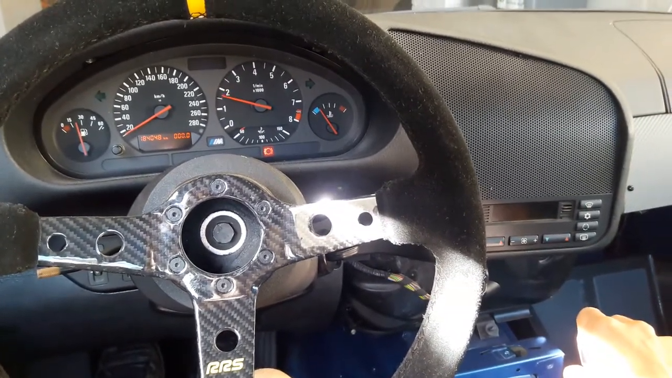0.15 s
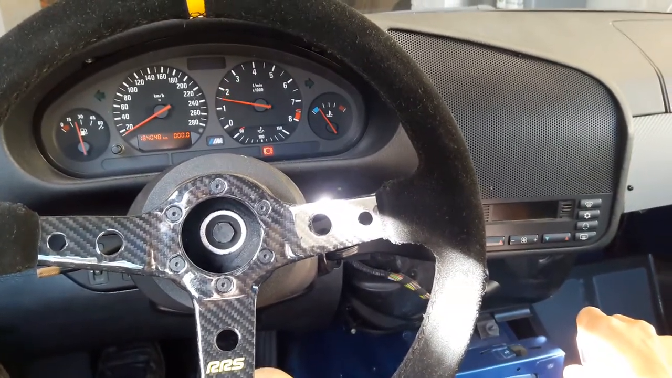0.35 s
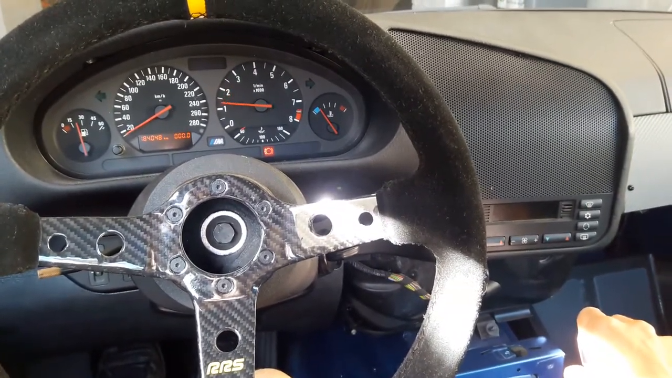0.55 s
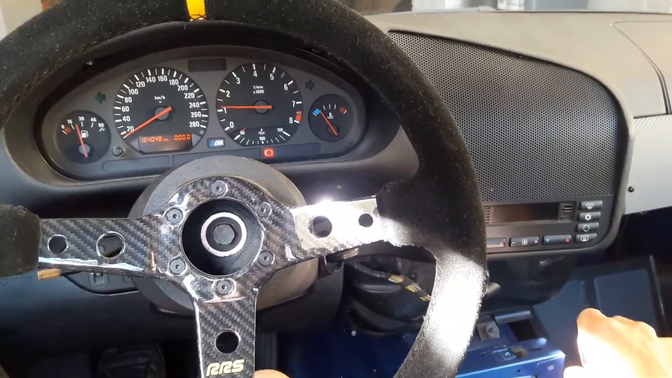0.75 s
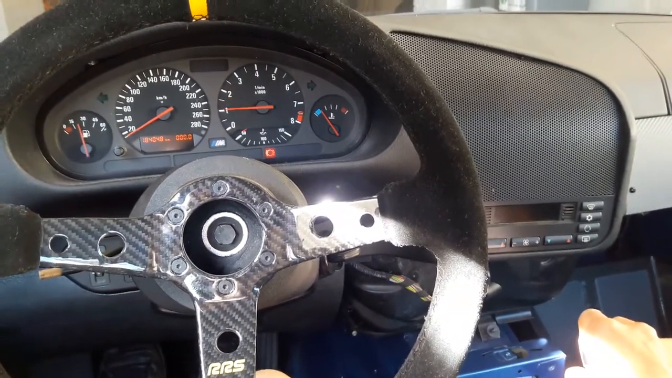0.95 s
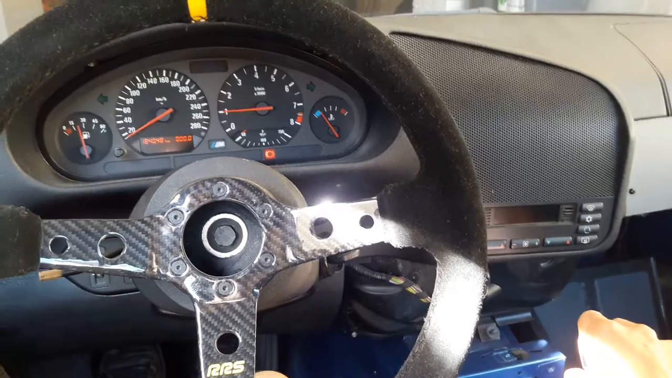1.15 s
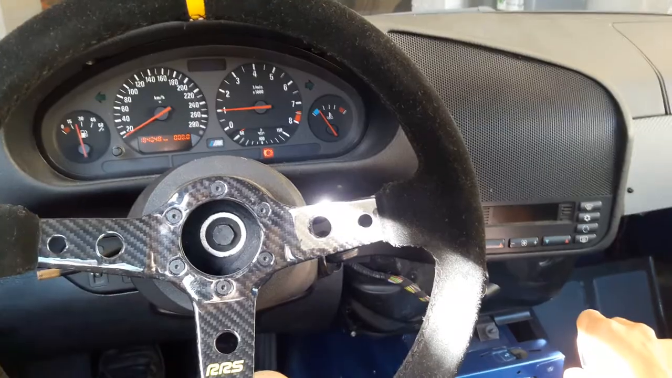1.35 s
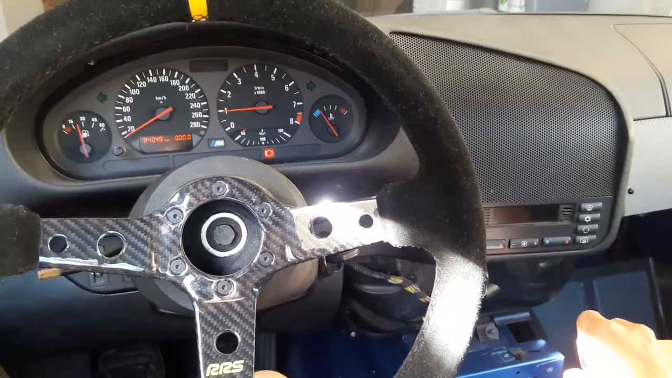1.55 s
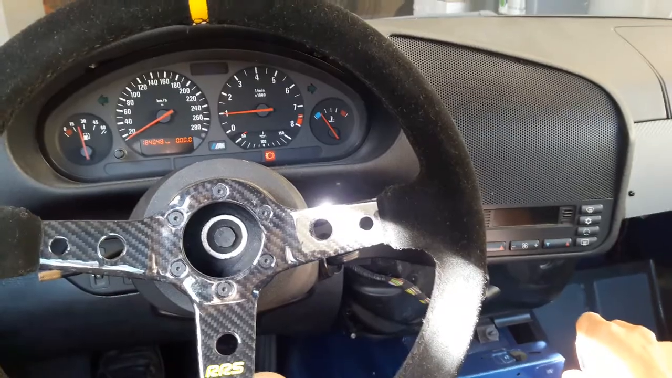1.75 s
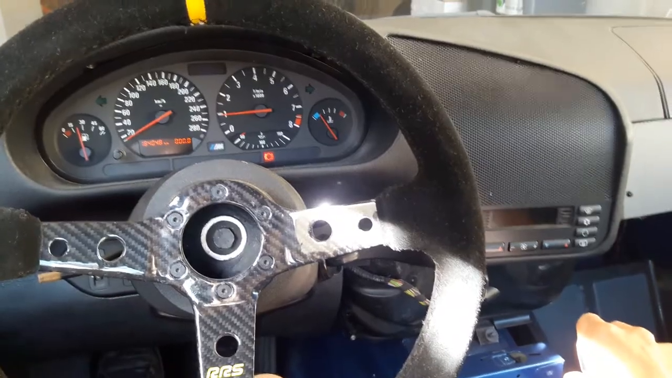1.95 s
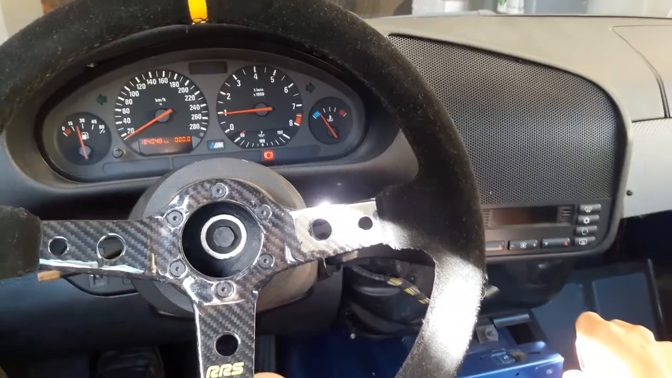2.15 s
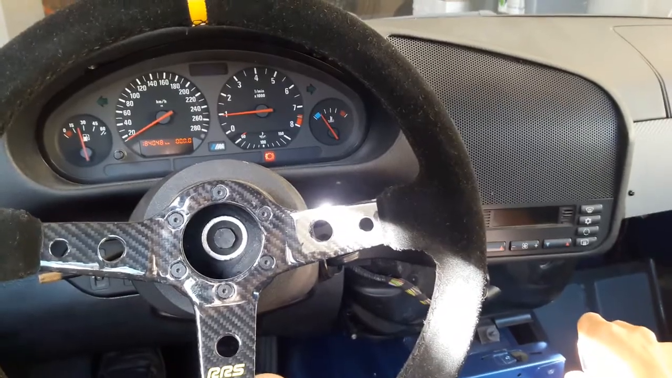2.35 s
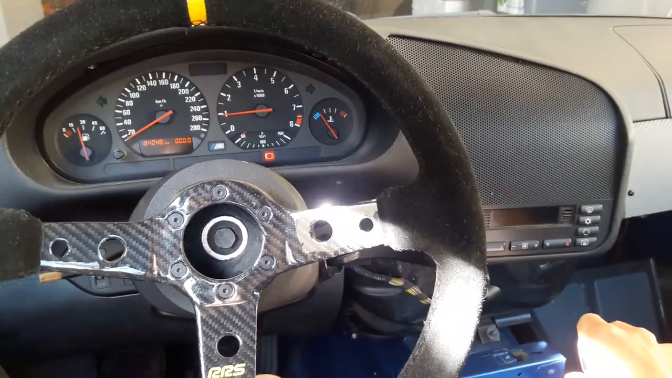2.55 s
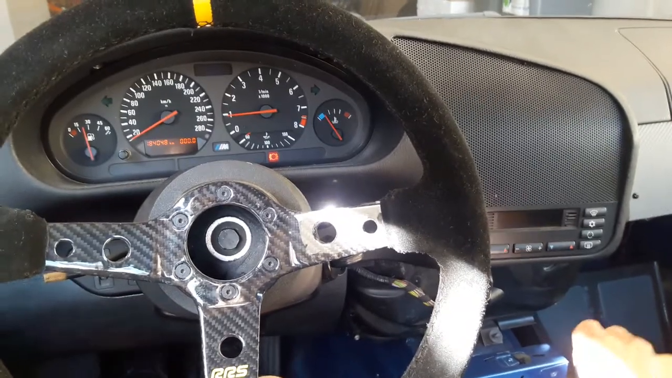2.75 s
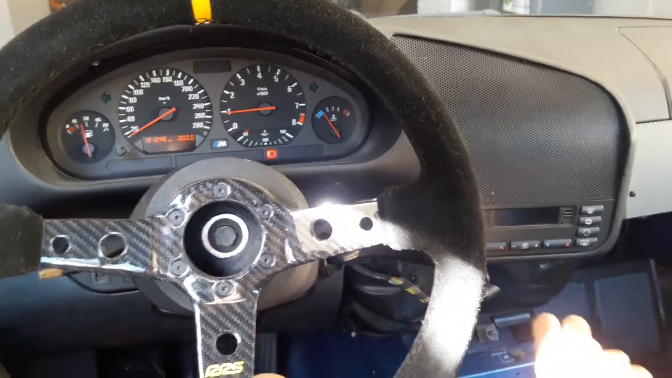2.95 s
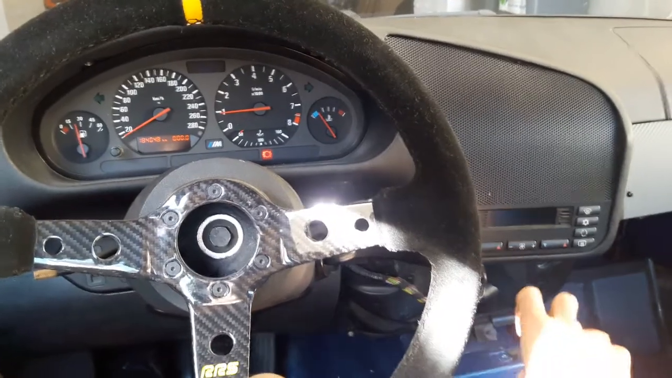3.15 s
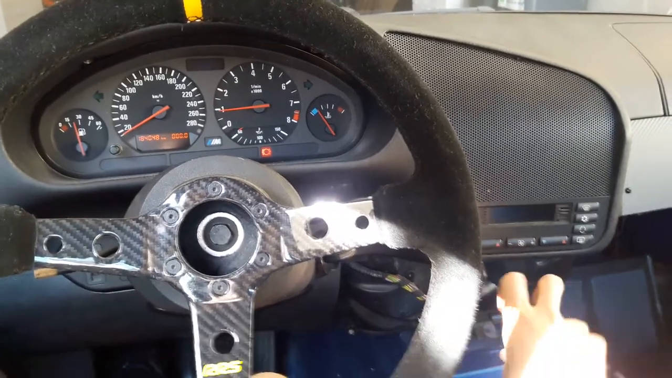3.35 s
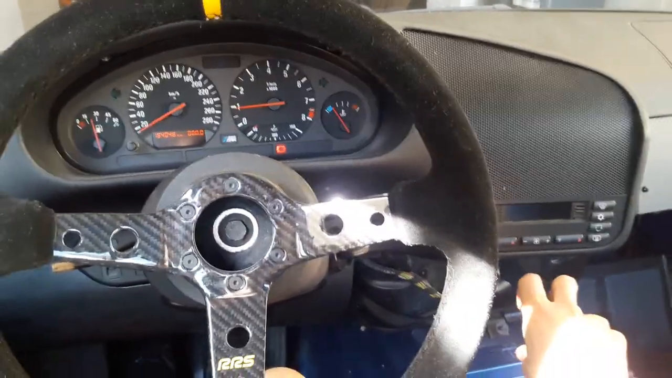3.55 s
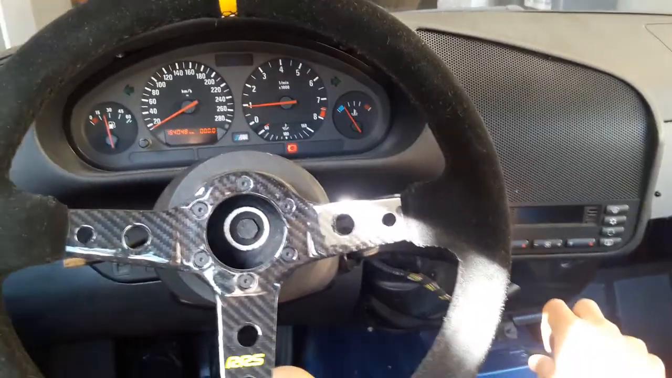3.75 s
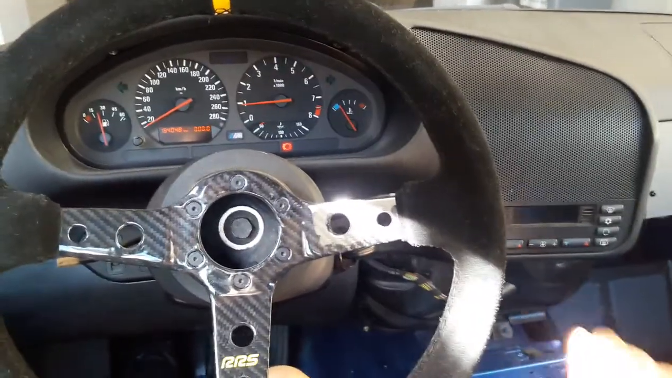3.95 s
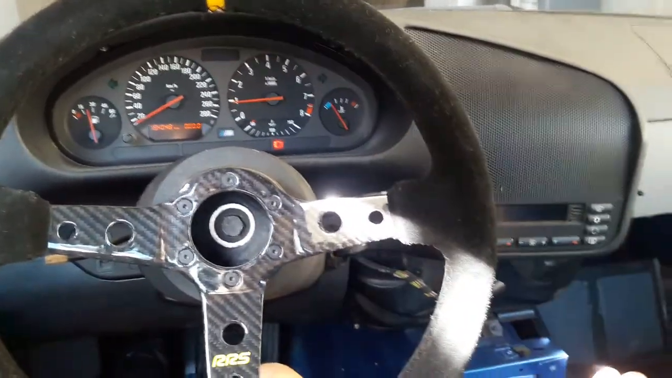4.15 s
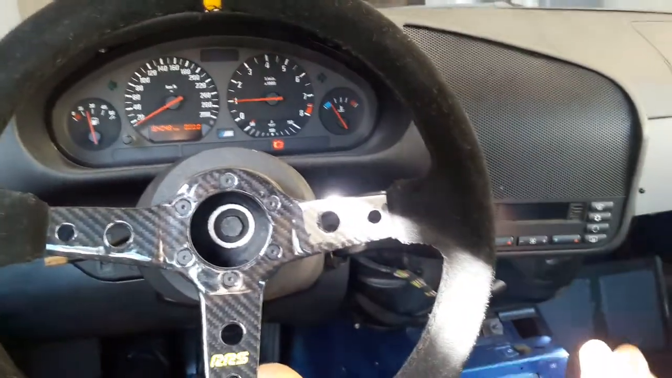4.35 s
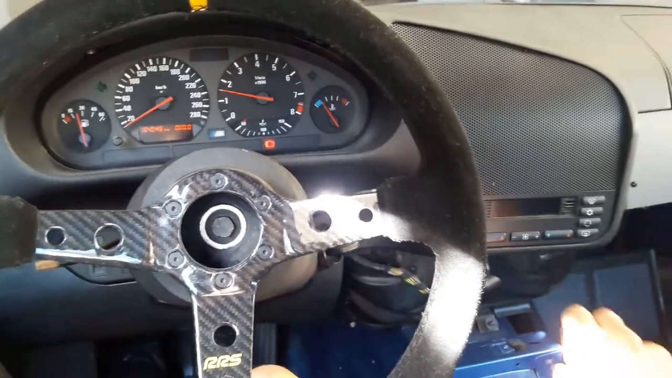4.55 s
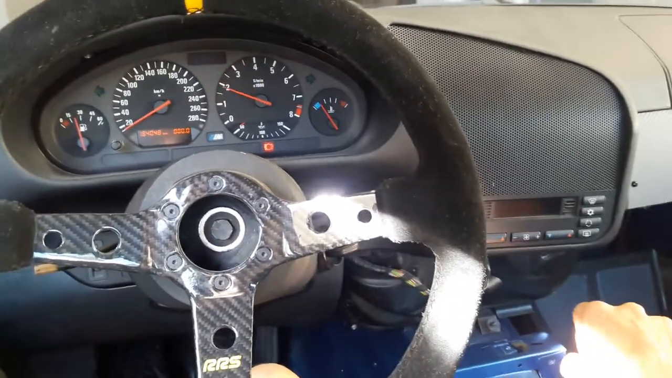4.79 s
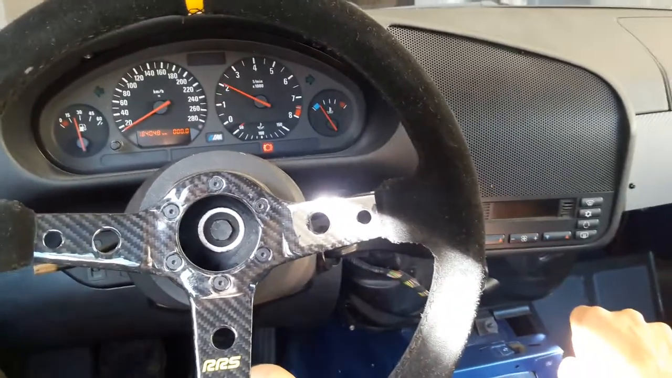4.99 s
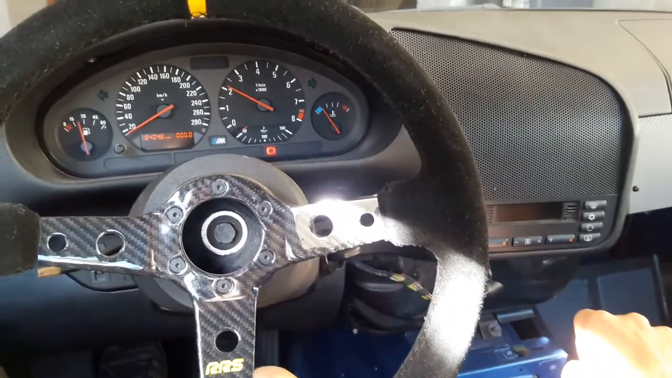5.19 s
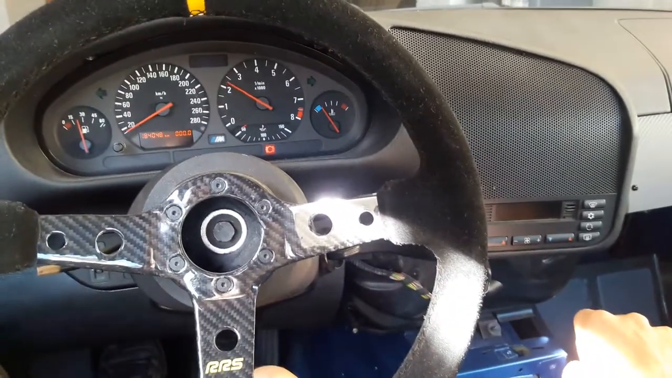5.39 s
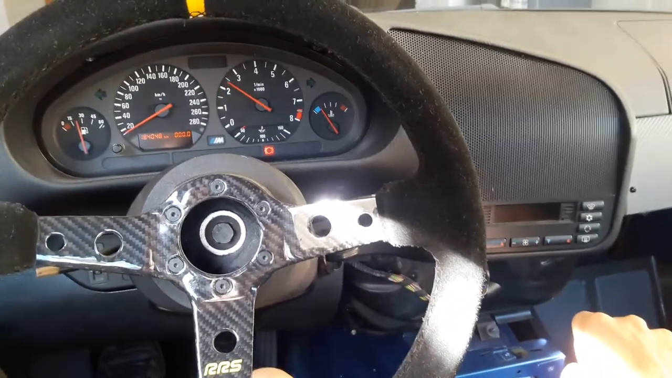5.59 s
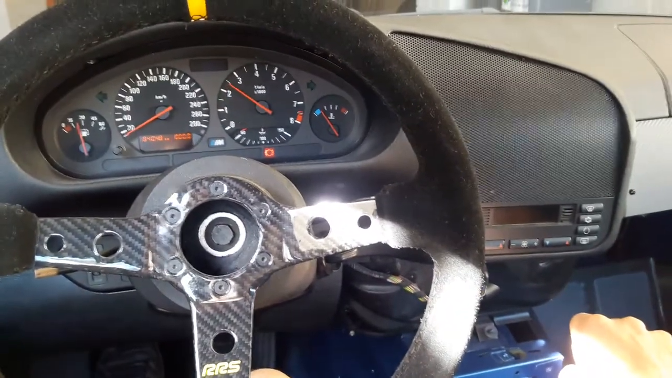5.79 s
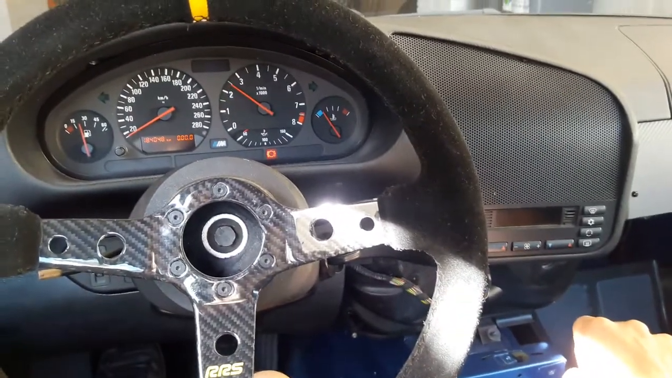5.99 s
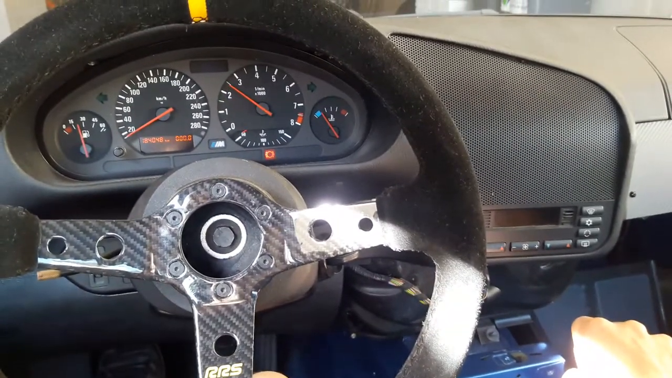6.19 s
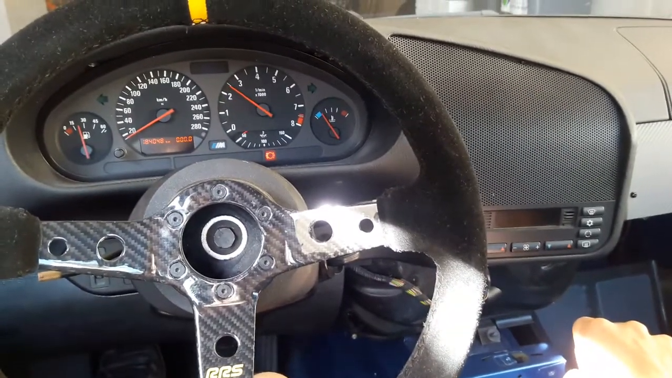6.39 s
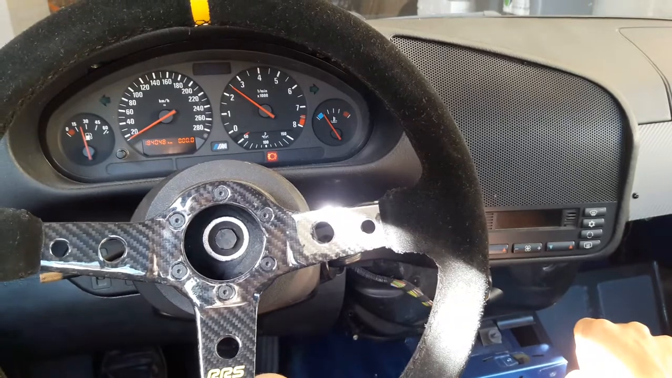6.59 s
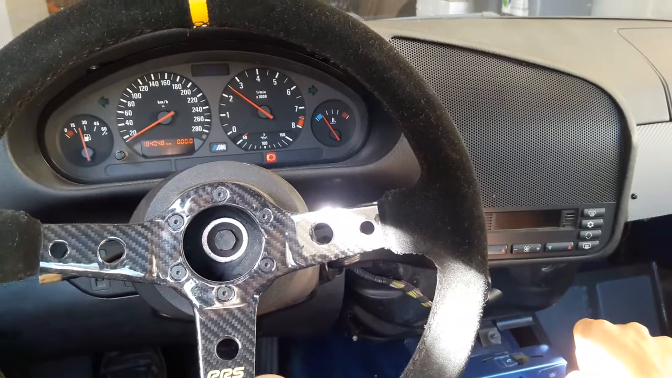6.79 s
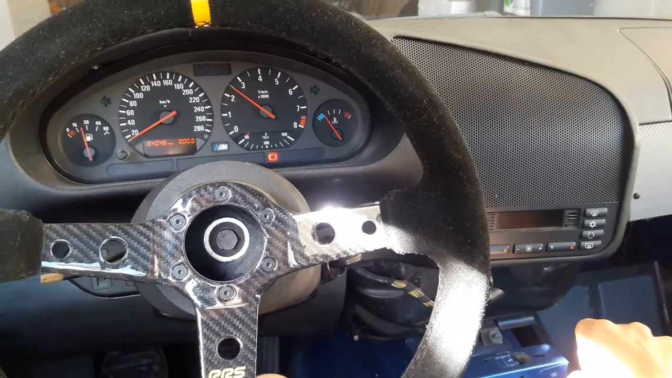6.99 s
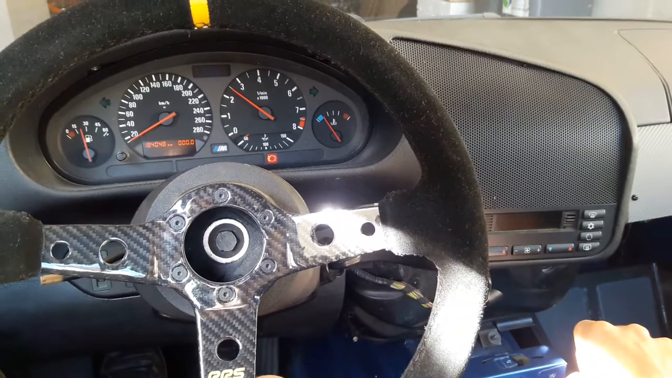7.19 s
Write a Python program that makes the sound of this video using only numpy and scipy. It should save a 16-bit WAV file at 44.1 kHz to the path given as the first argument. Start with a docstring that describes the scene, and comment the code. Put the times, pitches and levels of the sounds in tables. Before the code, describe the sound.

Close stereo inside a parked car's cabin: a six-cylinder engine falls from raised revs to a low, lumpy, booming idle. Near three seconds the gear lever clicks, creaks and clunks dully. Just after four seconds another clunk, then a puff of intake hiss as revs climb, with chain and gear whine, and hold in a steady throaty drone.

```python
"""A six-cylinder engine, heard by two microphones in the car's cabin, sinks to a lumpy idle; later it is revved and held.
The exhaust is a sum of crank orders with scatter, booming through pipe and cabin. Chain and gearbox whine,
with thin high whines above, as tones locked to the crank; valve gear rustles and air hisses past the throttle
as shaped noise. Close by, the gear lever clunks as short noise bursts ringing its linkage, and creaks as short
narrow tones of smeared pitch."""
import sys
import numpy as np
from scipy import signal
from scipy.fft import rfft, irfft, next_fast_len
from scipy.io import wavfile
from scipy.ndimage import uniform_filter1d

SR = 44100
rng = np.random.default_rng(int(sys.argv[2]) if len(sys.argv) > 2 else 0)


def invert_db(level):
    """Linear amplitude ratio for a level in decibels (20 dB per decade), elementwise."""
    return 10 ** (np.asarray(level, dtype=float) / 20)


def file_out(sig):
    """Save sig as 16-bit WAV at sys.argv[1]."""
    # one column per channel
    cols = np.atleast_2d(sig).T
    # limit, then scale
    lim = np.clip(cols, -1, 1)
    pcm = np.round(lim * 32767).astype(np.int16)
    wavfile.write(sys.argv[1], SR, pcm)


N = 318843


def unit(x):
    """Scale to rms 1."""
    return x / np.sqrt(np.mean(x ** 2) + 1e-20)


def along(points, hz):
    """Read f/Hz, value points on a log frequency axis."""
    f, v = np.transpose(points)
    return np.interp(np.log(hz + 1), np.log(f + 1), v)


def curves(rows):
    """One value per sample for each column after the time."""
    s, *cols = np.transpose(rows)
    return [np.interp(np.arange(N) / SR, s, c) for c in cols]


def wobble(rate):
    """A random curve of straight pieces, rate knots a second."""
    knots = rng.standard_normal(int(N / SR * 60) + 2)  # enough for rates up to 60
    return np.interp(np.arange(N) * rate / SR, np.arange(len(knots)), knots)


def filtered(x, response):
    """Filter x by a complex response of frequency, with padding so that tails do not wrap round."""
    m = 2 * next_fast_len(N // 2 + SR // 4)
    return irfft(rfft(x, m) * response(np.fft.rfftfreq(m, 1 / SR)), m)[..., :N]


def causal(gain):
    """The minimum-phase response with this gain, which rings only after its cause."""
    cepstrum = irfft(np.log(gain))
    half = len(cepstrum) // 2
    cepstrum[1:half] *= 2
    cepstrum[half + 1:] = 0
    return np.exp(rfft(cepstrum))


def bumps(rows, hz):
    """Gain of resonances that stand above a flat response."""
    return invert_db(sum(db / (1 + (2 * (hz - c) / w) ** 2) for c, w, db in rows))


def rush(spectrum):
    """Stereo noise of rms 1 with this spectrum, alike at both microphones in the bass, unlike in the treble."""
    # likeness of the two microphones: f/Hz, correlation
    alike = [(100, 0.99), (350, 0.67), (500, 0.2), (700, 0.21), (1000, 0.22), (1400, 0.38), (2000, 0.087),
             (3500, 0.039)]

    def mid_side_gain(hz):
        turn = np.arccos(np.clip(along(alike, hz), -1, 1)) / 2
        return invert_db(along(spectrum, hz)) * [np.cos(turn), np.sin(turn)]

    mid, side = filtered(rng.standard_normal((2, N)), mid_side_gain)
    return unit(np.array([mid + side, mid - side]))


def tone(order, crank, waver_db):
    """One crank order, rms 1 before it wavers; the pattern of firings sets its phase."""
    # strength of each firing, in firing order
    cylinders = [1.3, .8, 1.1, .7, 1.2, .9]
    phase = np.angle(np.fft.fft(cylinders))[round(2 * order) % 6]
    phase = phase + .13 * order ** 2  # longer pipe runs spread the high orders
    return np.sqrt(2) * invert_db(waver_db * wobble(9)) * np.cos(order * (crank - 3.1) + phase)


def intake():
    """Air hisses past the throttle as it opens: band-shaped noise whose level follows the air."""
    # air past the throttle: t/s, level/dB before a small random waver
    air = [(0, -62.5), (4.19, -83), (4.23, -49.5), (4.3, -54), (4.6, -58.5), (5, -56), (5.5, -57),
           (7.23, -61.5)]
    # colour of the air noise: f/Hz, relative density/dB
    air_colour = [(3000, -63.5), (4500, -8), (5800, 1), (6800, -6), (7400, -17.5), (9000, -51.5)]
    return invert_db(curves(air)[0] + 1.7 * wobble(25)) * rush(air_colour)


def valve_gear(crank, rustle_db):
    """A rustle that pulses with the firings and rings the panels, and a high hiss that puffs once an engine cycle."""
    # colour of the rustle ahead of the panels: f/Hz, relative density/dB
    rustle_colour = [(180, -32.5), (300, 1.5), (422, -10.5), (515, -8.5), (629, -16), (746, -15),
                     (812, -12), (1020, -16), (1180, -15), (1380, -14.5), (2400, -21), (2570, -22.5),
                     (5020, -34.5), (9000, -55), (11700, -85.5), (19800, -120)]
    # colour of the high hiss: f/Hz, relative density/dB
    hiss_colour = [(4710, -32), (8000, -11), (9130, -5.5), (9950, 2.5), (11400, 6), (13400, 1.5),
                   (15500, 0)]
    # panel resonances: f/Hz, width/Hz, boost/dB
    panels = [(1213, 83, 3.5), (1590, 69, 3.5), (1890, 50, 5), (2330, 11, 8), (2772, 13, 12), (4070, 19, 0),
              (4560, 40, -2.5), (6360, 55, 8)]
    cycle = crank / 2 - 1.2  # one engine cycle takes two crank turns
    beat_db = 0.29 * np.cos(3 * crank) + 0.54 * np.cos(cycle) + 0.99 * wobble(19)
    rustle = invert_db(rustle_db + 8 + beat_db) * filtered(rush(rustle_colour), lambda hz: bumps(panels, hz))
    puff = np.exp(4 * (np.cos(cycle) - 1))
    steady_hiss = invert_db(-72 + .6 * wobble(11)) * rush(hiss_colour)
    puffing_hiss = invert_db(-64 + 1.5 * wobble(8)) * puff * rush(hiss_colour)
    speed_hiss = invert_db(rustle_db - 23 + .7 * wobble(12)) * rush(hiss_colour)
    return rustle + steady_hiss + puffing_hiss + speed_hiss


def whines(crank, revved, rustle_db, firing_hz):
    """Tooth meshes sing at whole numbers of teeth per turn, loudest where their cases resonate; thin whines join."""
    # chain mesh and its sidebands: crank order, relative level/dB (mesh above 0, sidebands below)
    chain_mesh = [(18.5, -14.5), (19, 3), (19.5, -10.5), (20, -4)]
    # gear mesh and its sidebands: crank order, relative level/dB (mesh above 0, sidebands below)
    gear_mesh = [(28.5, -13), (29, 4), (29.5, -7)]
    # level of the chain at its mesh pitch: f/Hz, level/dB
    chain_case = [(290, -32), (305, -41.5), (330, -38.5), (360, -42.5), (420, -50), (560, -46), (700, -43),
                  (760, -35.5), (815, -36)]
    # level of the gears at their mesh pitch: f/Hz, level/dB with the clutch up
    gear_case = [(450, -51.5), (475, -39.5), (500, -52.5), (620, -53.5), (740, -49), (805, -41),
                 (850, -56.5), (1000, -59.5), (1090, -32.5), (1180, -42), (1245, -38)]
    # thin high whines, chain and gear overtones among them: crank order
    thin_orders = [16.35, 24.9, 27.05, 37, 39, 43.75, 48.9, 50.5, 54.1, 57.1, 57.5, 58, 58.5, 64.55, 66.5,
                   76, 87, 95, 113.3]
    # a row for each thin whine, against the rustle ahead of the housing: idle/dB, revved/dB, left over right/dB
    thin_levels = [(-30, -18.5, -0.5), (-23.5, -14.5, -2.5), (-24, -10.5, -6), (-15.5, -12.5, 1),
                   (-18, -13.5, 9), (-18.5, -7, 5), (-29, -16, -1.5), (-26.5, -21, -4.5), (-27.5, -20.5, 0),
                   (-13, -13, -0.5), (-13.5, -26.5, 5), (-9.5, -24.5, 0.5), (-12.5, -28.5, 0),
                   (-22, -22, -3), (-19.5, -23.5, -5), (-33.5, -18, 0), (-29.5, -28, -7), (-35, -24, -7.5),
                   (-38, -25.5, -11.5)]
    # the thin whines swell as they cross these: f/Hz, width/Hz, boost/dB
    housing = [(1085, 55, 10), (2730, 37, 3)]
    sideband_revved_db = -4  # the meshes run smoother at speed
    clutch_down_s, clutch_up_s, clutch_travel_s, clutch_db = 2.82, 4.98, 0.13, -24  # down, it hushes the gears

    def mesh(rows):
        total = np.zeros(N)
        for order, db in rows:
            smoother_db = sideband_revved_db * revved * (db < 0)
            total += invert_db(db + smoother_db) * tone(order, crank, waver_db=2.1)
        return total

    thin = np.zeros((2, N))
    for order, (idle_db, rev_db, pan_db) in zip(thin_orders, thin_levels):
        level = invert_db(idle_db + revved * (rev_db - idle_db))
        thin += invert_db([[pan_db / 2], [-pan_db / 2]]) * level * tone(order, crank, waver_db=2.5)
    t = np.arange(N) / SR
    turns_hz = firing_hz / 3
    clutch = np.clip(np.minimum(t - clutch_down_s, clutch_up_s - t) / clutch_travel_s, 0, 1)
    chain_db = along(chain_case, chain_mesh[1][0] * turns_hz) + 1.2 * wobble(4)
    gear_db = along(gear_case, gear_mesh[1][0] * turns_hz) + clutch_db * clutch + 3 * wobble(10)
    chain = invert_db(chain_db) * mesh(chain_mesh) * invert_db([[-1.6], [1.6]])
    gear = invert_db(gear_db) * mesh(gear_mesh) * invert_db([[-1.3], [1.3]])
    return chain + gear + invert_db(rustle_db) * filtered(thin, lambda hz: bumps(housing, hz))


def contacts():
    """Every touch of the lever (t/s, drive, knock, ring, snap/dB, t60/s); a shift's touches swell and fade."""
    # single hard clicks: t/s, drive level/dB, then against it ring/dB, snap/dB
    clicks = [(2.8271, -25.5, -15, -42), (2.8982, -23, -8.5, -17.5), (2.91, -28, -18, -31),
              (3.4474, -20.5, -25, -45.5), (4.1465, -20, -12, -28.5), (4.2, -33.5, -3, -34.5)]
    # pushes through the gate, runs of dull contacts: t/s, length/s, drive level/dB, then against it knock/dB, ring/dB
    shifts = [(3.409, 0.082, -23, 6, -18.5), (4.135, .06, -24, 6.5, -11.5)]
    click_knock_db, click_t60_s = -5.5, .055
    contact_gap_s, shift_snap_db, shift_t60_s = 0.0092, -45.5, .07
    rows = [(s, db, click_knock_db, ring_db, snap_db, click_t60_s) for s, db, ring_db, snap_db in clicks]
    for start, length, db, knock_db, ring_db in shifts:
        chance = rng.standard_normal((12, 2))
        after = np.abs(contact_gap_s * (np.arange(len(chance)) + 0.16 * chance[:, 0]))
        push_db = db - 10 * (2 * after / length - .85) ** 2 + 1.5 * chance[:, 1]
        push_db = push_db - 99 * (after > length)  # no contact once the push is over
        rows += [(start + a, p, knock_db, ring_db, shift_snap_db, shift_t60_s) for a, p in zip(after, push_db)]
    return rows


def lever():
    """Each contact is a short rattle into the linkage resonances; the boot creaks in narrow bands."""
    # linkage resonances, 3 knock, 2 body, 2 ring, 2 snap: f/Hz, width/Hz, level/dB relative within its group
    linkage = [(314, 68, 6.5), (477, 35, 3), (780, 210, -2.5), (1090, 446, 1.5), (1530, 190, -3.5),
               (3010, 230, 9), (4800, 1900, -2), (5130, 2700, 4.5), (12000, 6000, -7.5)]
    # creaks: t/s, length/s, f/Hz, level/dB ahead of the padding
    boot_creaks = [(2.825, 0.029, 1950, -32), (3.812, 0.038, 1580, -33.5)]
    knob_hz = 4470  # the padded knob and boot dull each contact above this
    t = np.arange(SR // 5) / SR
    parts, creaks = np.zeros((4, 2, N + SR)), np.zeros((2, N + SR))  # parts: knock, body, ring, snap
    for s, db, knock_db, ring_db, snap_db, t60 in contacts():
        noise = rng.standard_normal(len(t)) + 1.34 * rng.standard_normal((2, len(t)))
        burst = (1 - np.exp(-t / 0.0006)) * noise
        part_t60 = t60 * np.array([[1.2], [.95], [1.3], [.25]])
        fades_db = np.array([[knock_db], [0], [ring_db], [snap_db]]) - 60 * t / part_t60
        parts[..., round(s * SR):][..., :len(t)] += invert_db(db + fades_db)[:, None] * burst
    for s, length, hz, db in boot_creaks:
        stroke = np.sin(np.pi * np.clip(t / length, 0, 1))
        drift = np.cumsum(0.11 * rng.standard_normal((2, len(t))), axis=1)  # slips smear the pitch
        creaks[:, round(s * SR):][:, :len(t)] += invert_db(db) * stroke * np.sin(2 * np.pi * hz * t + drift)

    def mode(f, c, w):
        return 1j * f * w / (c * c - f * f + 1j * f * w)

    def ringing(x, rows):
        return filtered(x[:, :N], lambda f: sum(invert_db(db) * mode(f, c, w) * mode(f, c, 3 * w) for c, w, db in rows))

    knock = invert_db(11.0) * ringing(parts[0], linkage[:3])
    body = invert_db(8.5) * ringing(parts[1], linkage[3:5])
    ring = invert_db(6) * ringing(parts[2], linkage[5:7])
    snap = invert_db(11.5) * ringing(parts[3], linkage[7:])
    soft = filtered(knock + body + ring + creaks[:, :N], lambda f: 1 / (1 + 1j * f / knob_hz) ** 2)
    return soft + snap  # the snap escapes the padding


def exhaust(crank, revved, change):
    """Firing orders and the half orders of unequal cylinders, plus scatter, boom through pipe and cabin."""
    # exhaust orders: crank order, idle/dB, revved/dB, all relative
    orders = [(1.0, -17, -12), (1.5, -11, -6.5), (2.0, 0, -14.5), (2.5, -11.5, -7.5), (3.0, -4.5, 1.5),
              (3.5, -5, -8), (4.0, -8, -12.0), (4.5, -14, -7), (5.0, -5.5, -16.5), (5.5, -18.5, -16),
              (6.0, 0.5, -3), (6.5, -9.5, -9), (7.0, -10.5, -20.5), (7.5, -9, -12.5), (8.0, -19.5, -7),
              (8.5, -9.5, -27), (9.0, -12.5, -2.5), (9.5, -17.5, -2), (10.0, -19.5, -21),
              (10.5, -18.5, -5.5), (11.0, -6, -15), (11.5, -5.5, -25), (12.0, -12.5, -3), (12.5, -19, -25),
              (13.0, -24, -12), (13.5, -24.5, -9.5), (14.0, -11, -11.5), (14.5, -10, -22),
              (15.0, -10.5, -26.5)]
    # exhaust drive, which follows the throttle: t/s, level/dB
    drive = [(0, -8.5), (.2, -13.5), (.3, -11.5), (.55, -11), (.8, -12.5), (1.3, -11.5), (1.7, -12),
             (4.25, -12), (4.35, -3.5), (4.5, -9.5), (4.63, -3.5), (4.95, -7), (5.3, -7.5), (5.75, -9),
             (6.3, -7), (6.9, -7.5), (7.23, -9)]
    # pipe and cabin boom: f/Hz, gain/dB
    cabin = [(30.0, -40), (45.0, -16), (58.0, -5), (75.0, -8), (88, -17.5), (105.0, -13), (125.0, -5.5),
             (137, -2.5), (145.0, 3), (155, -5), (170.0, -15), (210.0, -14), (260.0, -20.5), (320.0, -16.0),
             (400.0, -28), (500.0, -22), (650.0, -34.5)]
    # orders of unequal cylinders, against the firing orders: idle/dB, revved/dB
    uneven_levels = (-11, -1.5)
    # combustion scatter, against the exhaust drive: idle/dB, revved/dB
    scatter_levels = (-10, -8)
    uneven_swing_db, scatter_swing_db = 1.5, 7  # both grow while the speed swings
    pull_db_per_octave = 1.5  # brighter above the firing order while the engine pulls
    pipe_s = .01  # the pulses take a moment to run down the pipe
    swing, pull = np.abs(change), np.clip(change, 0, 1)
    late = np.maximum(np.arange(N) - pipe_s * SR, 0)
    jitter = (.05 + .08 * swing) * wobble(18)
    # valves open after the firing, never quite on time
    crank = np.interp(late, np.arange(N), crank) - 1.5 + jitter
    uneven_db = np.interp(revved, (0, 1), uneven_levels) + uneven_swing_db * swing
    pulses = np.zeros(N)
    for order, idle_db, rev_db in orders:
        firing = round(2 * order) % 6 == 0
        bright_db = pull_db_per_octave * pull * np.log2(order / 3)
        order_db = bright_db + idle_db + revved * (rev_db - idle_db) + (0 if firing else uneven_db)
        pulses += invert_db(order_db) * tone(order, crank, waver_db=0.7 + .12 * order)
    scatter_colour = [(50, -6), (150, 2.5), (400, 0.5), (800, -0.5), (1000, -66)]  # f/Hz, relative density/dB
    low = filtered(rng.standard_normal((2, N)), lambda hz: invert_db(along(scatter_colour, hz)))
    scatter_db = np.interp(revved, (0, 1), scatter_levels) + scatter_swing_db * swing
    scatter = invert_db(scatter_db) * unit(low[0] + 0.69 * low)  # partly shared by both microphones
    response = [(8, -62.0)] + cabin + [(900, -82.5)]
    boomed = filtered(invert_db(curves(drive)[0]) * (pulses + scatter), lambda hz: causal(invert_db(along(response, hz))))
    return boomed * invert_db([[-1.1], [1.1]])


def scene():
    """Three firings a crank turn set the angle that drives every engine layer."""
    # engine speed: t/s, firing rate/Hz
    speed = [(0.0, 88.5), (0.2, 78.9), (0.3, 76.4), (0.6, 61.2), (0.9, 53.1), (1.1, 51.4), (1.7, 49.2),
             (2.45, 47.9), (2.95, 48.0), (3.3, 47.2), (4.2, 46.9), (4.27, 49.6), (4.34, 54.5), (4.55, 82.7),
             (4.9, 109), (5.1, 112.2), (5.5, 123.9), (5.7, 126.6), (5.9, 127.5), (6.3, 128.4), (6.9, 128.5),
             (7.1, 127.5), (7.23, 127.7)]
    full_swing_hz_per_s, swing_s = 42.3, 0.42  # change of firing rate that counts as full, averaging time
    # the rustle grows with speed, and a little more while the speed falls
    rustle_idle_db, rustle_db_per_octave, idle_hz, coasting_db = -44.5, 8, 47.56, 0.5
    firing_hz, = curves(speed)
    crank = 2 * np.pi * np.cumsum(firing_hz / 3) / SR
    revved = np.clip((firing_hz - 60) / (115 - 60), 0, 1)
    change = uniform_filter1d(np.gradient(firing_hz) * SR, int(swing_s * SR)) / full_swing_hz_per_s
    rustle_db = rustle_idle_db + rustle_db_per_octave * np.log2(firing_hz / idle_hz)
    rustle_db = rustle_db + coasting_db * np.clip(-change, 0, 1)
    engine = exhaust(crank, revved, np.clip(change, -1, 1)) + whines(crank, revved, rustle_db, firing_hz)
    return engine + valve_gear(crank, rustle_db) + intake() + lever()


def low_pass(x):
    """Removes everything above the highest recorded frequency."""
    return signal.sosfilt(signal.butter(12, 15630, fs=SR, output="sos"), x)


def record(dry):
    """Waves standing across the cabin turn the phase between the two microphones; the loudest peaks are rounded."""
    # lead of the left microphone: f/Hz, phase/rad
    across = [(0, 0), (860, 0.1), (1150, 3), (1400, 3.5), (2100, 4), (2450, 7), (2800, 6.5), (3300, 6),
              (4000, 9.5)]
    left_only = np.array([[1], [0]])
    turned = filtered(dry, lambda hz: np.exp(1j * left_only * np.interp(hz, *np.transpose(across))))
    rounded = turned / (1 + np.abs(turned / .93) ** 6) ** (1 / 6)
    return low_pass(rounded)


dry = scene()
out = record(dry)
file_out(out)
```